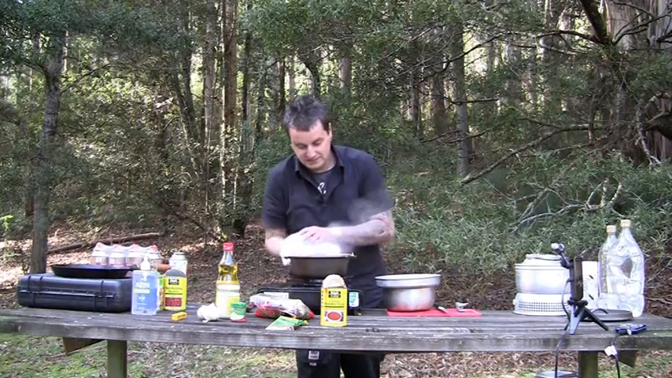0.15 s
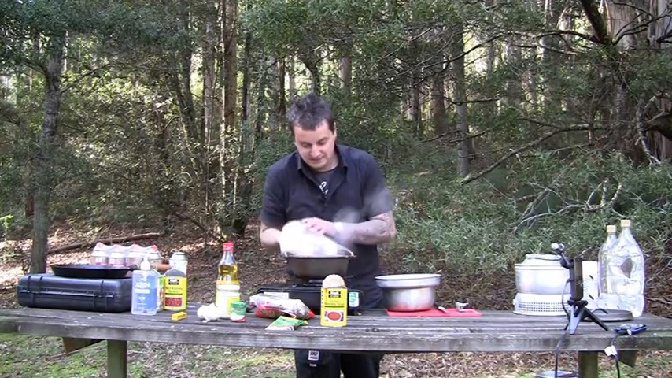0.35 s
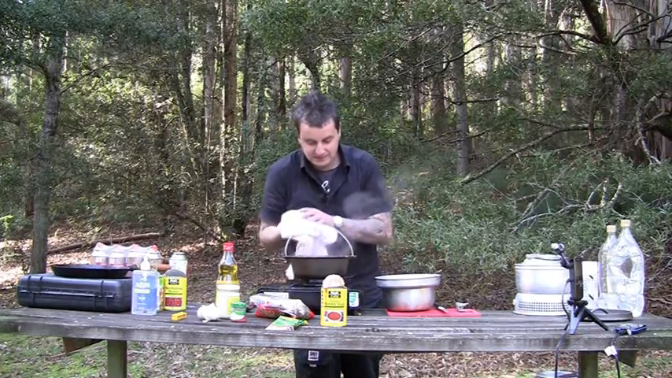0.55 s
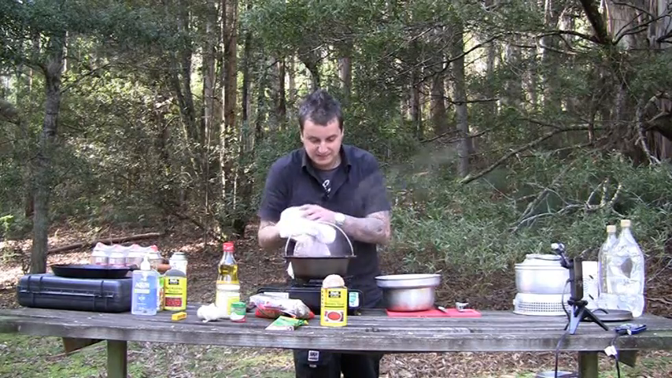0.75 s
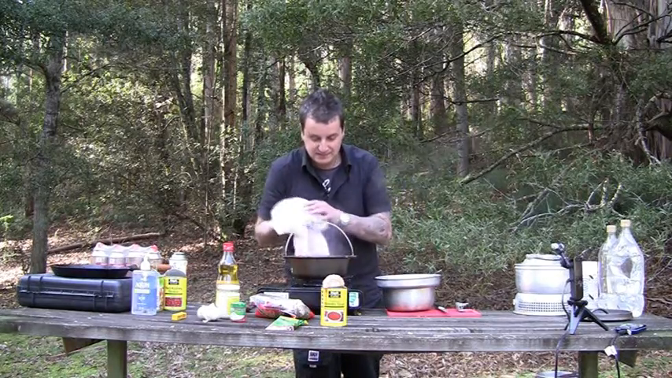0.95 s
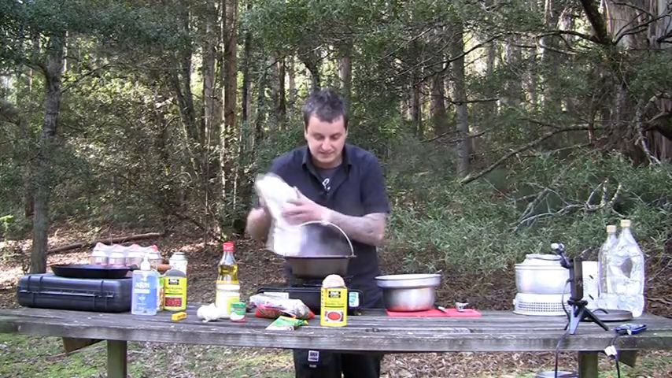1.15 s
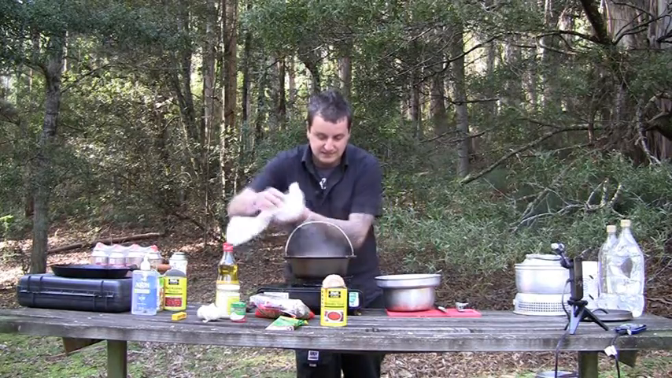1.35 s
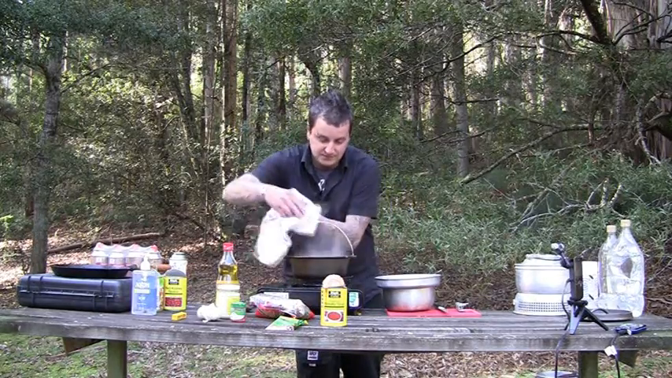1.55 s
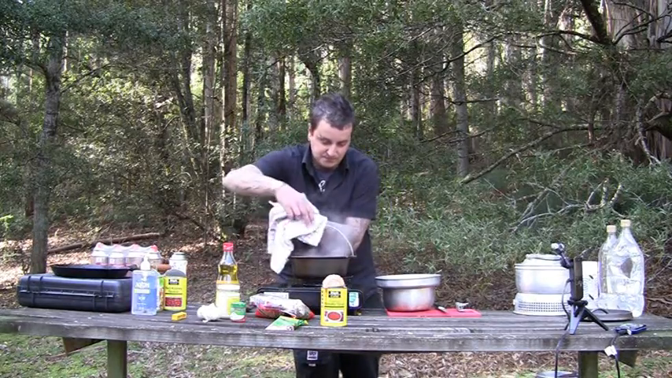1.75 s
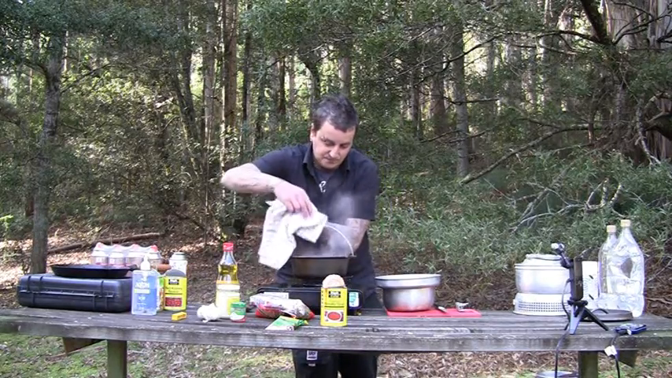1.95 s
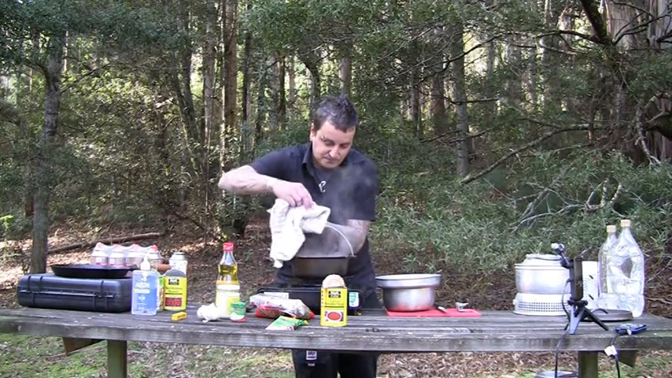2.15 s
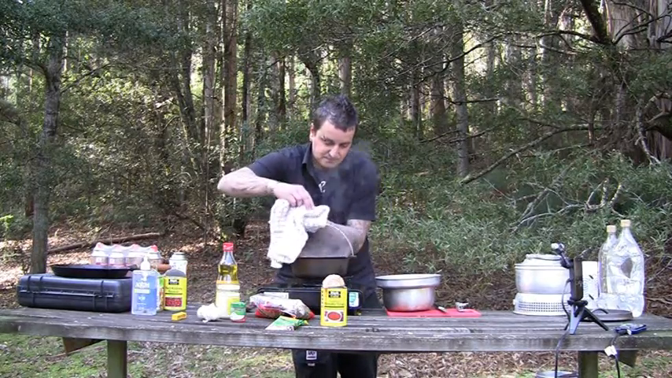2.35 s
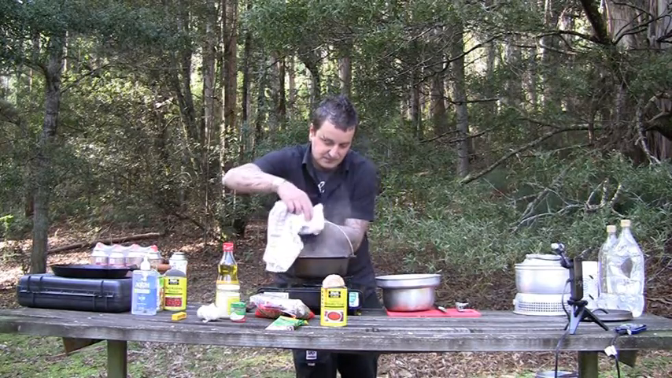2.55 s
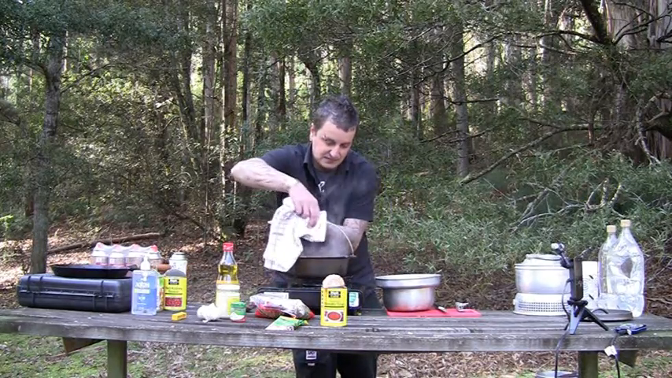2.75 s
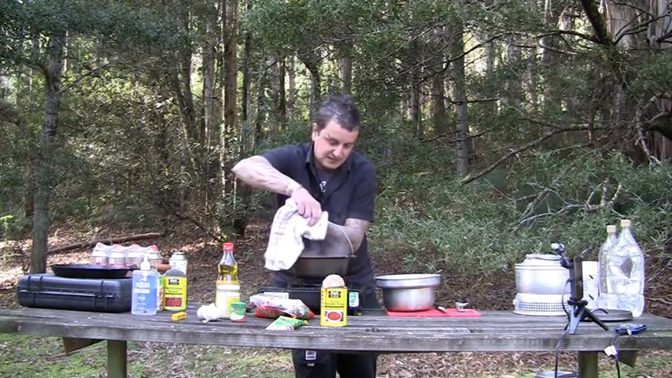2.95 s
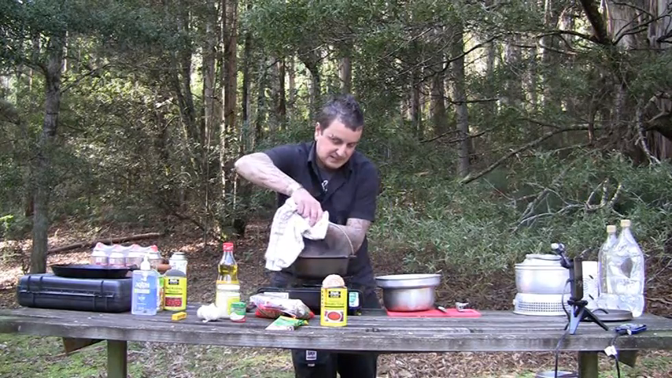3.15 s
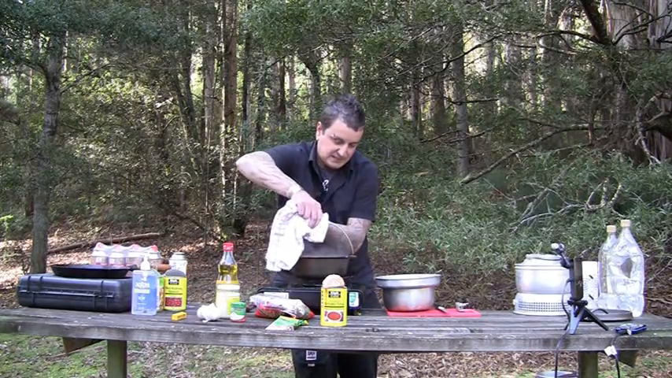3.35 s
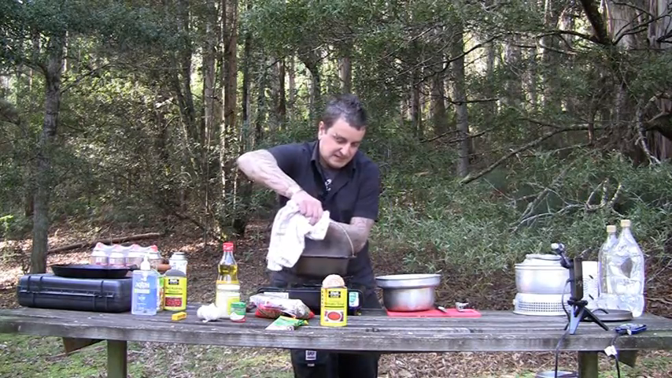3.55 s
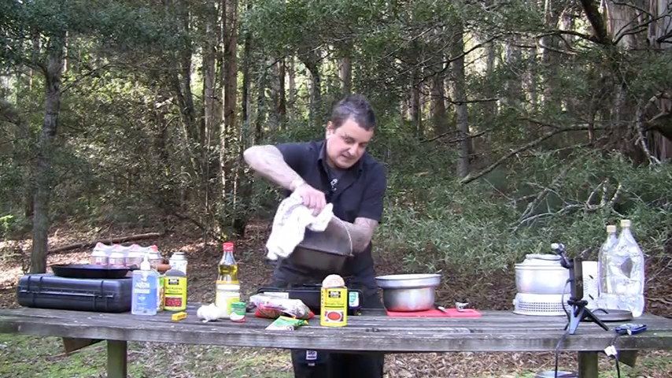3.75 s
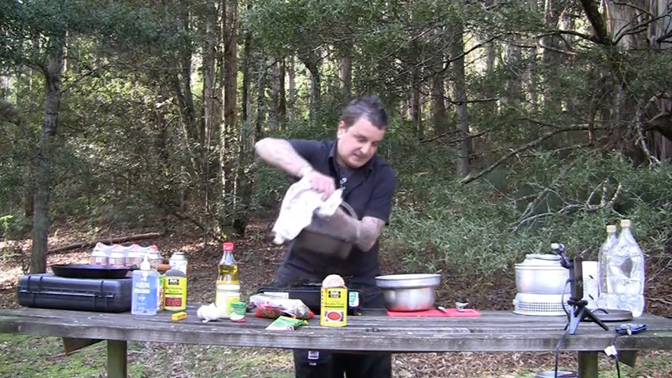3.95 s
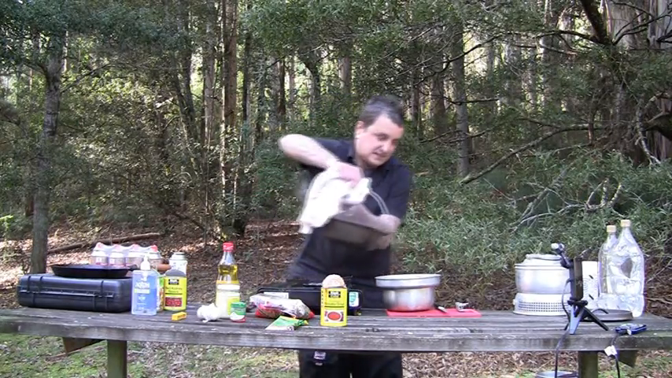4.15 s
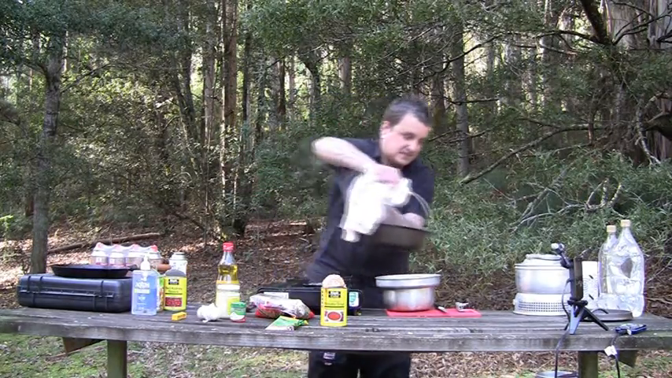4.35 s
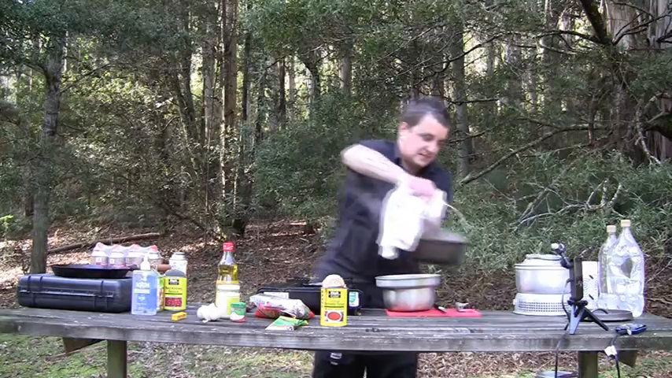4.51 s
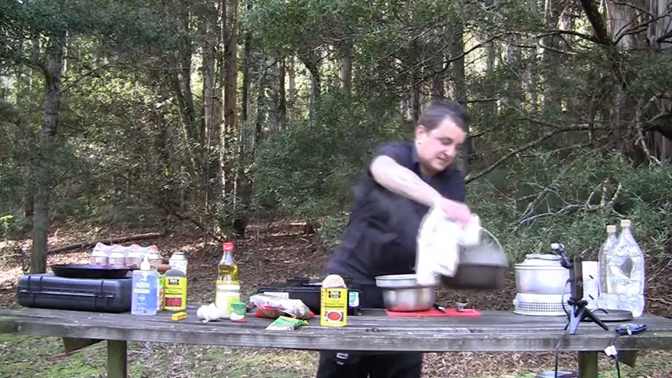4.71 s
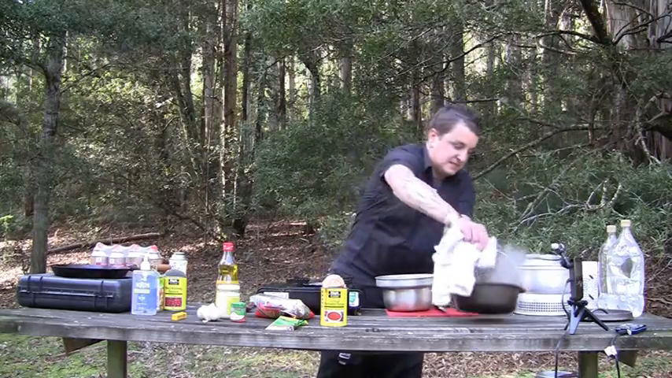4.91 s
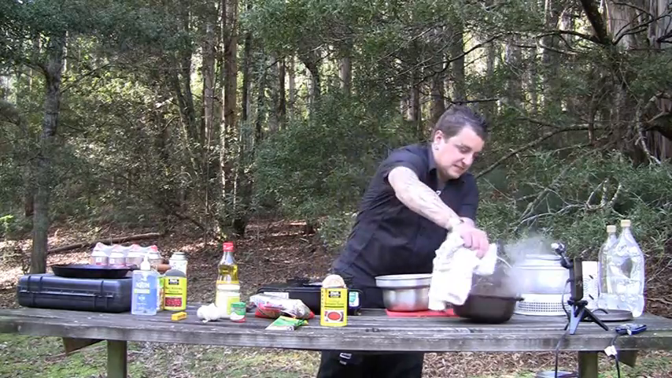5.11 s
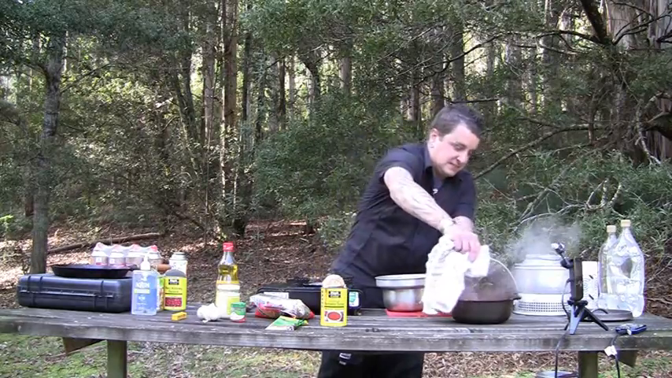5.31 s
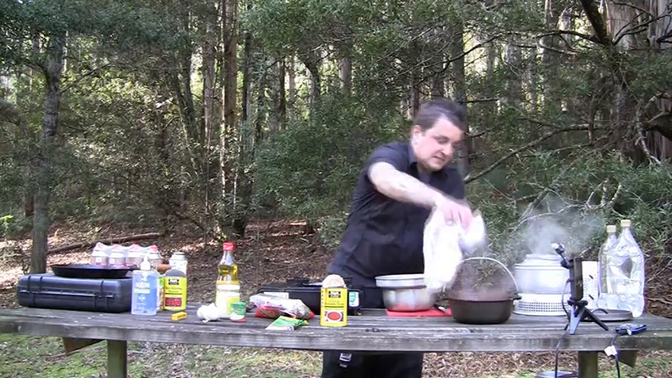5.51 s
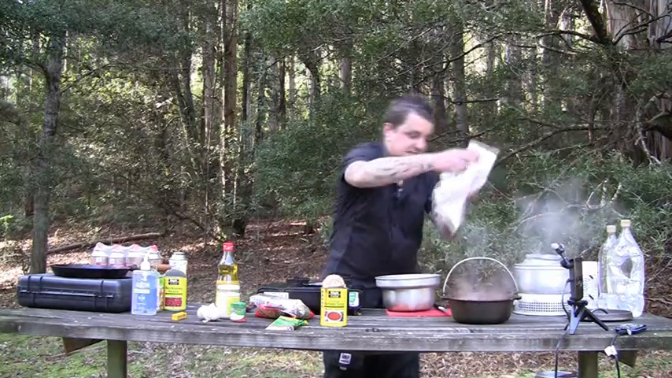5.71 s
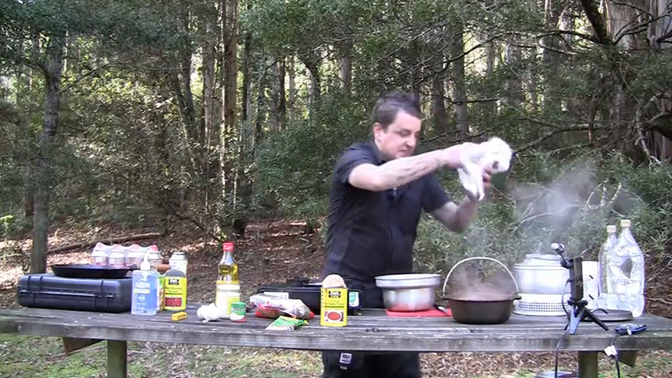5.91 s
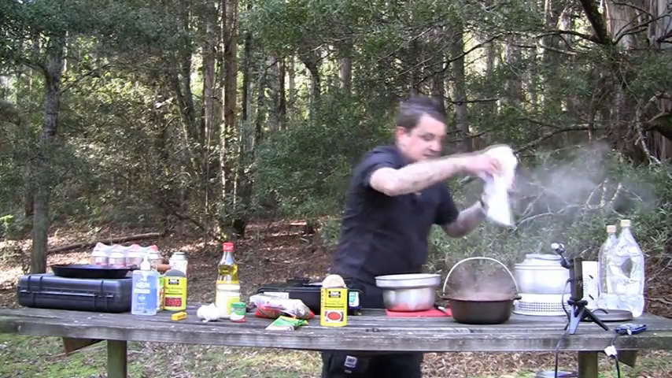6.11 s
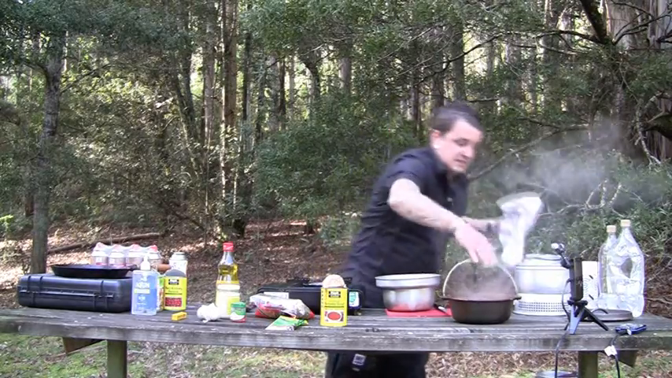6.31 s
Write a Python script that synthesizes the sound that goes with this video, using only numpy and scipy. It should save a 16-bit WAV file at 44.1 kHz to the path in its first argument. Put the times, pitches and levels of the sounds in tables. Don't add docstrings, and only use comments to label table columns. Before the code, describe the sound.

A small clothing microphone picks up faint bubbling stew, spitting fat and rustling sleeves over light hiss. A thin high gas whistle ends in a valve click. An iron pot scrapes and clanks off its grate, then after a short carry knocks and rocks down on wooden planks, its wire handle clattering. A clasp clicks and a very loud dry snap cracks near the microphone.

```python
import sys
import numpy as np
from scipy import signal
from scipy.fft import rfft, irfft, next_fast_len
from scipy.io import wavfile

SR = 44100
rng = np.random.default_rng(int(sys.argv[2]) if len(sys.argv) > 2 else 0)


def wav_out(sig):
    wavfile.write(sys.argv[1], SR, np.round(np.clip(np.atleast_2d(sig).T, -1, 1) * 32767).astype(np.int16))


def voltage_ratio(level):
    return 10 ** (np.asarray(level, float) / 20)


N = 281093

# frequency [Hz], level [dB per Hz].
RUMBLE_COLOUR = [(32, 0.5), (43, -2.5), (90, -2.5), (160, -11.5), (300, -15)]
SIMMER_COLOUR = [(150, -12.5), (330, 1), (550, -1.5), (900, -5.5), (1500, -10.5)]
CLOTH_COLOUR = [(900, -6.5), (1600, -2), (2400, -2.5), (3200, -0.5), (4200, -10), (7000, -15.5),
                (12000, -40)]
HISS_COLOUR = [(25, 6), (92, -2.5), (1560, -10), (7710, -13), (9840, -16.5), (11000, -13), (14800, -20.5),
               (16000, -16.5)]
# time [s], cloth rustle level [dB].
EFFORT = [(0, -64), (.3, -64.5), (.78, -63.5), (1.15, -58.5), (1.65, -62), (2.55, -64.5), (2.9, -58),
          (3.32, -59), (3.8, -63), (4.21, -59), (4.86, -58), (5.25, -60), (5.4, -57), (5.75, -60.5),
          (6.07, -56), (6.3, -53.5)]
# time [s], rumble level [dB].
SHUDDERS = [
    (3.0, -52.5),
    (3.6, -64),
    (4.2, -61),
    (5.22, -50),
    (5.3, -47.5),
    (5.55, -59),
    (6.02, -56.5),
    (6.25, -65),
]
# time of fullest sound [s], level [dB rms], half length [s], middle pitch [Hz].
BRUSHES = [(0.034, -61.5, 0.024, 2520), (0.457, -59, 0.055, 500), (1.203, -69, 0.028, 3020),
           (2.312, -60, 0.04, 350), (3.124, -57, 0.022, 2040), (3.381, -58, 0.033, 550),
           (3.628, -48.5, 0.028, 1100), (4.225, -57, 0.065, 1390), (4.46, -59, 0.085, 2440),
           (5.77, -59, 0.077, 2280), (6.152, -55.5, 0.043, 2430), (6.293, -58.5, 0.04, 3000)]
# start [s], peak level [dB], pitch [Hz].
BUBBLES = [(0.727, -46, 264), (0.982, -41, 285), (1.015, -41, 431), (1.016, -49, 800), (1.671, -53, 466),
           (1.747, -53, 436), (2.477, -46.5, 810), (2.696, -48, 590), (2.834, -41, 850), (3.288, -45, 460),
           (4.036, -42, 560), (4.231, -57, 250), (4.611, -47, 745), (5.925, -41.5, 473)]
# start [s], peak level [dB], pitch [Hz].
TICKS = [(0.0238, -53, 2900), (0.5048, -43.5, 2800), (0.9353, -38, 2750), (1.0495, -46, 3570),
         (1.0899, -45, 3300), (1.1613, -42, 3000), (1.3593, -45, 3530), (1.723, -41.5, 2900),
         (1.7913, -43, 3080), (2.6219, -45.5, 3250), (2.8724, -44, 3890), (4.9302, -44, 2340),
         (5.7294, -39, 2350), (5.7992, -42, 2600), (6.1614, -53, 2420), (6.2761, -48, 2600)]
# time [s], jump in pitch [Hz].
VALVE_SLIPS = [(2.577, 302), (2.645, 298), (2.688, 248), (2.735, 300), (2.79, 199), (2.826, 450),
               (2.872, 300), (2.905, 250)]
# start [s], swell [s], fade [s], peak level [dB].
SCRAPES = [
    (3.476, 0.025, 0.032, -52.5),
    (3.53, .1, 0.033, -43),
]

# start [s], peak level [dB], contact time [s], tilt towards high modes [dB per octave].
KNOB_HITS = [
    (2.931, -51, .004, 5),
    (2.9455, -26, 0.0021, -3.5),
    (2.949, -30.5, 0.0051, 4),
]
GRATE_HITS = [(3.575, -47, .01, 7), (3.5995, -23, 0.0019, 0), (3.6025, -19, .002, 3),
              (3.608, -25, 0.0016, 3), (3.619, -26.5, .003, 2), (3.627, -38, 0.031, -8),
              (3.642, -40, 0.0014, -11)]
TABLE_HITS = [(2.962, -44, 0.0045, 1), (2.982, -42, .003, -11), (5.086, -44, .003, 15),
              (5.114, -23.5, 0.0041, -2), (5.124, -44, 0.0035, 4), (5.134, -25, 0.0042, 18.5),
              (5.2045, -31, 0.0055, -5), (5.2928, -22.5, 0.0069, 6), (5.313, -29.5, 0.0046, 1),
              (5.474, -47, .003, -12), (5.531, -32.5, 0.0027, 5), (5.537, -41, 0.0048, 11),
              (6.02, -50, 0.006, 7), (6.111, -37, 0.0043, 3)]
POT_HITS = [
    (5.2125, -30.5, 0.0042, 6),
    (5.297, -33, 0.004, 21.5),
    (5.535, -46, 0.0026, -5),
]
HANDLE_HITS = [
    (4.271, -36, 0.0012, -9),
    (5.296, -26, 0.005, 5.5),
    (5.5662, -28.5, 0.0025, 5.5),
]
HELD_HITS = [(3.316, -42, 0.0048, -2), (3.3525, -35.5, 0.0056, 0.5), (3.490, -35.5, 0.009, 2.5),
             (3.510, -34, 0.0053, 3), (3.556, -40, .003, 4), (4.8935, -38.5, .0012, 4),
             (5.115, -38, 0.014, 6), (5.476, -43.5, .001, 5), (5.533, -35.5, 0.029, 1),
             (5.55, -38.5, 0.013, 6), (5.826, -42.5, .002, 5)]
CLASP_HITS = [
    (6.328, -33, 0.0025, -1.5),
    (6.3378, -22.5, 0.0018, .6),
]
SNAP_HITS = [
    (6.3575, -31, 0.003, 16),
    (6.361, -17, 0.003, 1),
]

# frequency [Hz], level [dB], time to fall 60 dB [s].
KNOB = [(92, -13, 0.14), (460, 1, 0.067), (780, 4, 0.029), (1140, -4.5, 0.14), (1680, 0, 0.041),
        (2240, 0, 0.035), (2780, 5, .025), (3250, -3, .02), (4000, -14, .02), (4650, -21, .02),
        (5400, -20, 0.018), (6500, -21, .02)]
GRATE = [(436, -14, 0.15), (1515, -7, 0.13), (1556, 10.5, 0.043), (1800, 5, 0.047), (2290, 7, 0.043),
         (2465, 2, 0.059), (3070, -3.5, 0.074), (3280, -1, 0.05), (3920, -12, 0.064), (4730, -10, 0.035),
         (5860, -10, 0.02), (8200, -29, 0.032), (7300, -12, 0.012), (10900, -17, 0.014)]
TABLE = [(132, -7.5, 0.14), (207, -2, 0.063), (269, -4.5, 0.11), (375.6, -5.5, 0.086), (460, -23, .06),
         (579, -17.5, 0.087), (774, -45, .05)]
POT = [(1150, -11, .04), (1486, 5.5, 0.054), (1565, -6, 0.031), (2170, -33, 0.036), (2740, -25, 0.067),
       (3570, -18.5, 0.054)]
HANDLE = [(1660, -5, 0.026), (2130, -0.5, 0.013), (2500, 4, 0.022), (2910, 8, 0.007), (3240, -0.5, 0.016),
          (3430, 6.5, 0.033), (4010, 3.5, 0.017), (4270, -5, 0.017), (4930, -3.5, 0.017),
          (5830, -0.5, 0.014), (6420, -1.5, .015), (6930, -8, 0.021), (8240, -13.5, .012),
          (10200, -20, .012)]
# frequency [Hz], level [dB], time to fall 60 dB [s].
HELD = [(550, -1.5, 0.03), (900, -6, 0.041), (1550, -2, 0.0085), (2250, 1.5, 0.0061), (3300, 2.5, 0.0043),
        (4020, -5, 0.011), (5300, -11, 0.0053), (6500, -16, 0.0043), (7700, -16.5, 0.0038),
        (9600, -21, .004), (12200, -24, .004)]
CLASP = [(610, -6, 0.02), (1676, -1.5, 0.044), (2770, 3, 0.017), (3520, 1, 0.011), (5060, -10, 0.011),
         (7000, -15, .01), (9000, -18, .01)]
SNAP = [(560, 2, 0.017), (770, 8, 0.021), (1690, -8, 0.036), (2240, -6, 0.033), (3330, 0, 0.02),
        (4240, -2, .02), (4740, 0, 0.016), (6500, 5, 0.035), (7740, 3, 0.022), (9200, 9.5, 0.017),
        (9950, 0, 0.022), (12300, -4, .012), (12900, -13, .02)]
# frequency [Hz], peak level [dB], time to fall 60 dB [s].
CRACK_BODY = [(200, -39, .07), (700, -23, .016)]

RUMBLE_DB, RUMBLE_FOLLOWS = -58.5, 0.22
SIMMER_DB, SIMMER_FOLLOWS = -62, 0.36
SHUDDER_RISE_S, SHUDDER_T60_S = 0.01, 1
SLOSH_DB = -9.5
SWAY_HZ, SWAY_DB = 40, -8.5
SIZZLE_DB, FLAME_OUT_S, COOLING_DB_PER_S, COOLED_DB = -70, 2.7, 15, -77
BUBBLE_T60_S, TICK_T60_S = 0.032, 0.03
VALVE_START_S, VALVE_SHUT_S, VALVE_DB, START_DB = 2.515, 2.947, -66.5, 3
VALVE_HZ, OVERSHOOT_HZ, SETTLE_S, SAG_HZ_PER_S = 7280, 1450, .015, 1350
SLIP_DB_PER_HZ, SLIP_S = .004, .03
PINCH_HZ, PINCH_S, FLUTTER = 450, .012, .019
SWELL_DB = 22.5
CRACK_S, CRACK_DB, CRACK_HZ, CRACK_T60_S, CRACK_TOP_HZ = 6.3605, -3.2, 8200, .00045, 11800
MIC_TOP_HZ, CUTOFF_HZ, HISS_DB = 14000, 15760, -57


def in_time(rows):
    s, *columns = np.transpose(rows)
    return [np.interp(np.arange(N) / SR, s, column) for column in columns]


def coloured(x, spectrum):
    hz, db = np.transpose(spectrum)
    size = next_fast_len(N)
    octaves = np.log2(np.fft.rfftfreq(size, 1 / SR) + 1)
    below = np.maximum(np.log2(hz[0]) - octaves, 0)
    above = np.maximum(octaves - np.log2(hz[-1]), 0)
    gain_db = np.interp(octaves, np.log2(hz), db) - 13.7 * (below + above)
    y = irfft(rfft(x, size) * voltage_ratio(gain_db), size)[..., :N]
    return y / np.sqrt(np.mean(y ** 2))


def drift(rate):
    r = np.exp(-80 * np.pi * rate / SR)
    noise = rng.standard_normal(N // 40 + 2002)
    slow = signal.lfilter([1], [1, -2 * r, r * r], noise)[2000:]
    return np.interp(np.arange(N) / 40, np.arange(len(slow)), slow / slow.std())


def ring(clicks, hz, t60):
    r = voltage_ratio(-60 / (max(t60, 2e-4) * SR))
    w = 2 * np.pi * hz / SR
    return signal.lfilter([0, np.sin(w)], [1, -2 * r * np.cos(w), r * r], clicks + 1e-18)


def grains(per_s, spread_db):
    sizes = voltage_ratio(spread_db * np.minimum(rng.exponential(1, N), 4)) * rng.choice([-1, 1], N)
    return sizes * (rng.random(N) < per_s / SR)


def add(out, s, db, sound):
    at = round(s * SR)
    out[at:at + len(sound)] += (voltage_ratio(db) * sound / np.abs(sound).max())[:N - at]


def blows(hits, body, rough, blur_db, scatter_db=3.5, sign=-1):
    out, t = np.zeros(N), np.arange(SR // 5) / SR
    chatter = rng.standard_normal((len(hits), len(t))) ** 3 / 4
    luck = rng.standard_normal((len(hits), len(body)))
    for (s, db, contact_s, tilt_db), noise, chance in zip(hits, chatter, luck):
        push = np.exp(-(t * body[-1][0] * 1.35 - 2) ** 2)
        fading = np.exp(-t / max(contact_s, 1e-4))
        force = push / push.sum() + rough * noise * fading / np.sqrt(SR * contact_s)
        sound = 0
        for k, (hz, mode_db, t60) in enumerate(body):
            octaves_up = np.log2(hz / body[0][0])
            gain = voltage_ratio(mode_db + tilt_db * octaves_up + scatter_db * chance[k])
            blur = voltage_ratio(blur_db) * ring(force, hz * 1.019, t60 * 0.21)
            sound = sound + gain * (ring(force, hz, t60) + blur) * sign ** k
        add(out, s, db, sound)
    return out


def background():
    cloth_db, = in_time(EFFORT)
    swing_db = cloth_db - cloth_db.mean()
    t = np.arange(N) / SR
    shaken = np.zeros(N)
    for s, db in SHUDDERS:
        rise = np.clip((t - s) / SHUDDER_RISE_S + 1, 0, 1)
        shaken += voltage_ratio(db - 60 * np.abs(t - s) / SHUDDER_T60_S) ** 2 * rise
    rumble = coloured(rng.standard_normal(N) * voltage_ratio(2.0 * drift(16.0)), RUMBLE_COLOUR)
    simmer = coloured(grains(900 * voltage_ratio(3 * drift(12)), spread_db=3.0), SIMMER_COLOUR)
    cloth = coloured(grains(3500 * voltage_ratio(4.3 * drift(15)), spread_db=3.0), CLOTH_COLOUR)
    rumble_gain = np.sqrt(voltage_ratio(RUMBLE_DB + RUMBLE_FOLLOWS * swing_db) ** 2 + shaken)
    simmer_gain = np.sqrt(voltage_ratio(SIMMER_DB + SIMMER_FOLLOWS * swing_db) ** 2 + shaken * voltage_ratio(SLOSH_DB) ** 2)
    sway = ring(rng.standard_normal(N), SWAY_HZ, 0.88)
    table_sway = voltage_ratio(SWAY_DB) * np.sqrt(shaken) * sway / sway.std()
    return table_sway + rumble_gain * rumble + simmer_gain * simmer + voltage_ratio(cloth_db - 3.5) * cloth


def brushes():
    fibres, out, t = grains(5000, spread_db=3.0), np.zeros(N), np.arange(N) / SR
    for s, db, half_s, hz in BRUSHES:
        near = np.abs(t - s) < 3 * half_s
        band_filter = signal.butter(1, [hz * 0.68, hz * 1.15], "band", fs=SR, output="sos")
        band = signal.sosfilt(band_filter, fibres[near])
        out[near] += voltage_ratio(db) * np.exp(-((t[near] - s) / half_s) ** 2) * band / band.std()
    return out


def sizzle():
    since_out = np.maximum(np.arange(N) / SR - FLAME_OUT_S, 0)
    db = np.maximum(SIZZLE_DB - COOLING_DB_PER_S * since_out, COOLED_DB)
    spits = grains(400 * voltage_ratio(5.5 * drift(6.2)), spread_db=7.0)
    dealt = rng.integers(0, 8, N)
    pitches = np.geomspace(2400, 3800, 8)
    sound = sum(ring(spits * (dealt == k), hz, 30 / hz) for k, hz in enumerate(pitches))
    return voltage_ratio(db) * sound / sound.std()


def small_sounds(rows, t60, partner, partner_db):
    out, click = np.zeros(N), 1. * (np.arange(SR // 10) == 0)
    for s, db, hz in rows:
        neighbour = voltage_ratio(partner_db) * ring(click, hz * partner, t60 * 0.33)
        add(out, s + 0.00112, db - 2.5, ring(click, hz, t60) + neighbour)
    return out


def valve():
    t = np.arange(N) / SR
    since = np.maximum(t - VALVE_START_S, 0)
    opening = np.clip(np.minimum(t - VALVE_START_S, VALVE_SHUT_S - t) / .006, 0, 1)
    jerks = sum(jump_hz * (t > s) * np.exp(-np.abs(t - s) / SLIP_S) for s, jump_hz in VALVE_SLIPS)
    hz = VALVE_HZ + OVERSHOOT_HZ * np.exp(-since / SETTLE_S) - SAG_HZ_PER_S * since
    hz -= PINCH_HZ * np.exp(-np.abs(VALVE_SHUT_S - t) / PINCH_S)
    phase = 2 * np.pi * np.cumsum(jerks + hz * (1 + FLUTTER * drift(420))) / SR
    db = VALVE_DB + START_DB * np.exp(-since / 0.043) + SLIP_DB_PER_HZ * jerks
    breath_db = 1.9 * drift(70) + 3.6 * drift(300)
    return np.sqrt(2) * opening * voltage_ratio(db + breath_db) * np.sin(phase)


def scrape():
    t = np.arange(N) / SR
    slips = grains(2700, spread_db=-4.0)
    sound, stroke = np.zeros(N), np.zeros(N)
    for k, (hz, level_db, t60) in enumerate(GRATE):
        sound += voltage_ratio(0.34 * level_db) * ring(slips, hz, 0.14 * t60) * (-1) ** k
    for s, swell_s, fade_s, peak_db in SCRAPES:
        away = np.maximum((s + swell_s - t) / swell_s, (t - s - swell_s) / fade_s)
        stroke += voltage_ratio(peak_db - SWELL_DB * away ** 2) * (away < 1)
    return stroke * sound / sound.std()


def stove():
    knob = blows(KNOB_HITS, KNOB, rough=2.7, blur_db=3)
    grate = blows(GRATE_HITS, GRATE, rough=1.4, blur_db=7.5)
    return valve() + knob + grate + scrape()


def table():
    planks = blows(TABLE_HITS, TABLE, rough=0.49, blur_db=-29, sign=0.89)
    return signal.sosfilt(signal.butter(2, 75, "high", fs=SR, output="sos"), planks)


def iron():
    pot = blows(POT_HITS, POT, rough=0.9, blur_db=-9)
    handle = blows(HANDLE_HITS, HANDLE, rough=1.6, blur_db=11.0)
    held = blows(HELD_HITS, HELD, rough=4.8, blur_db=16)
    return pot + handle + held


def crack():
    out, click = np.zeros(N), 1. * (np.arange(SR // 20) == 0)
    top_filter = signal.cheby2(10, 40, CRACK_TOP_HZ, fs=SR, output="sos")
    add(out, CRACK_S, CRACK_DB, signal.sosfilt(top_filter, ring(click, CRACK_HZ, CRACK_T60_S)))
    for hz, db, t60 in CRACK_BODY:
        add(out, CRACK_S, db, ring(click, hz, t60))
    return out


def snap():
    clasp = blows(CLASP_HITS, CLASP, rough=1.2, blur_db=3)
    return clasp + blows(SNAP_HITS, SNAP, rough=2.5, blur_db=7) + crack()


def scene():
    bubbles = small_sounds(BUBBLES, BUBBLE_T60_S, partner=1.96, partner_db=-9.5)
    ticks = small_sounds(TICKS, TICK_T60_S, partner=1.07, partner_db=2)
    quiet = background() + brushes() + sizzle() + bubbles + ticks
    return np.tile(quiet + stove() + table() + iron() + snap(), (2, 1))


def low_pass(x):
    return signal.sosfilt(signal.butter(12, 16410, fs=SR, output="sos"), x)


def record(dry):
    heard = signal.sosfilt(signal.butter(4, MIC_TOP_HZ, fs=SR, output="sos"), dry)
    hiss = voltage_ratio(HISS_DB) * coloured(rng.standard_normal(dry.shape), HISS_COLOUR)
    size = next_fast_len(N)
    passed = np.fft.rfftfreq(size, 1 / SR) < CUTOFF_HZ
    mix = irfft(rfft(heard + hiss, size) * passed, size)[:, :N]
    return low_pass(mix)


dry = scene()
out = record(dry)
wav_out(out)
```